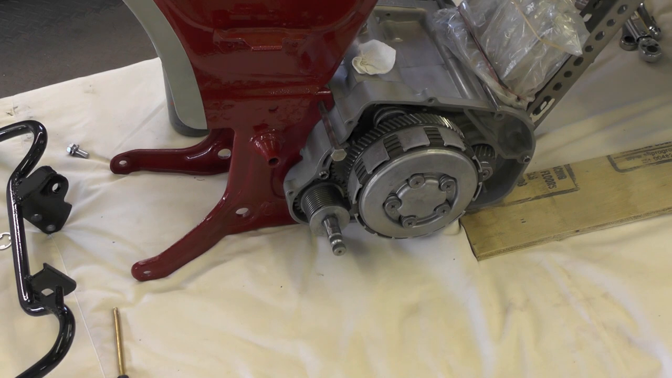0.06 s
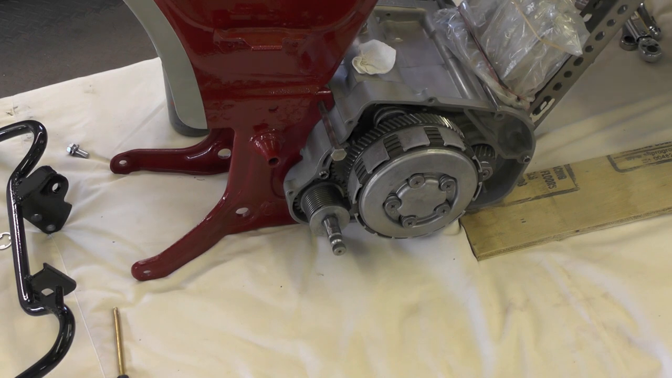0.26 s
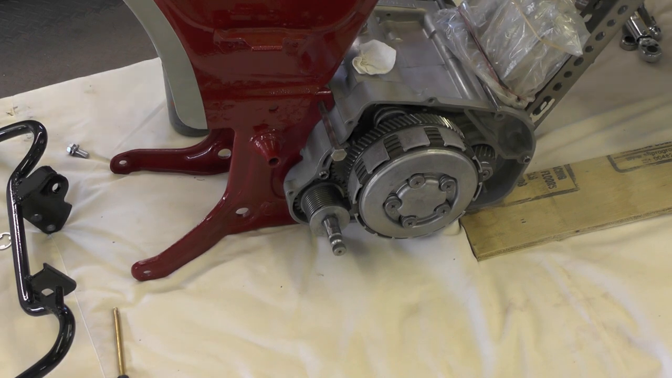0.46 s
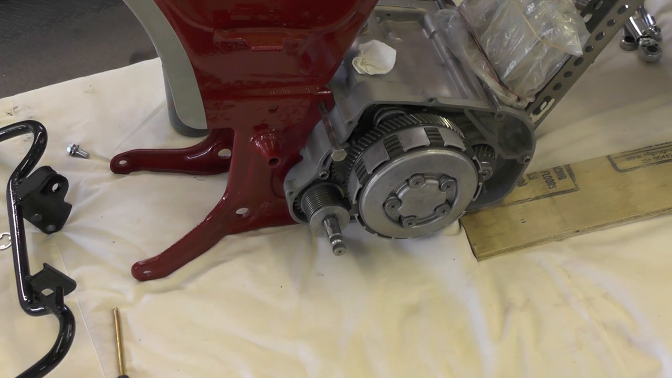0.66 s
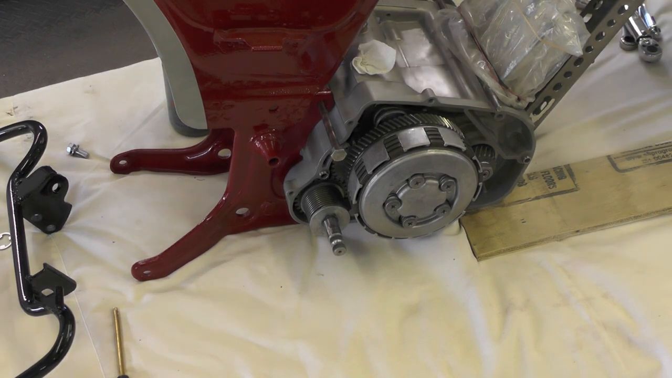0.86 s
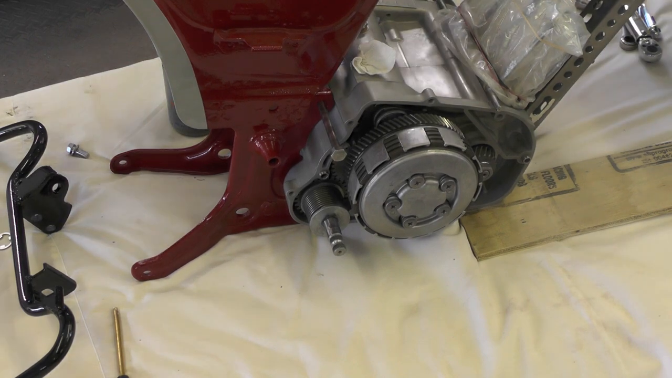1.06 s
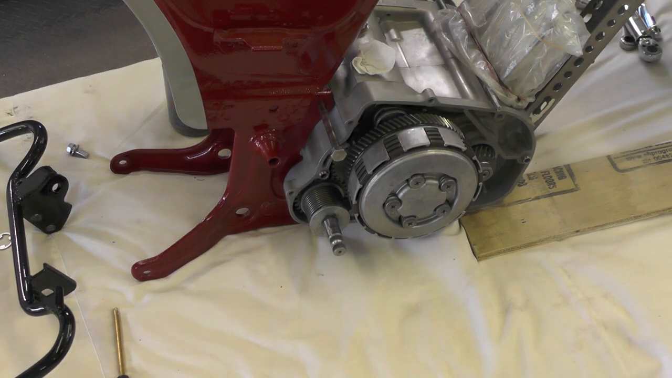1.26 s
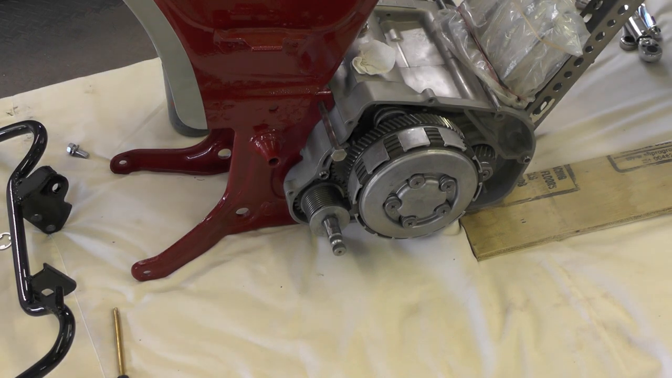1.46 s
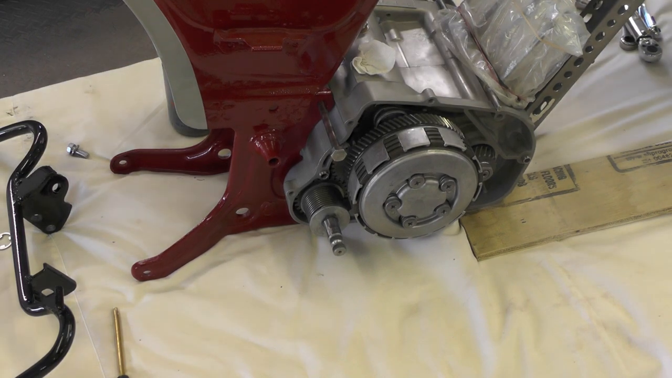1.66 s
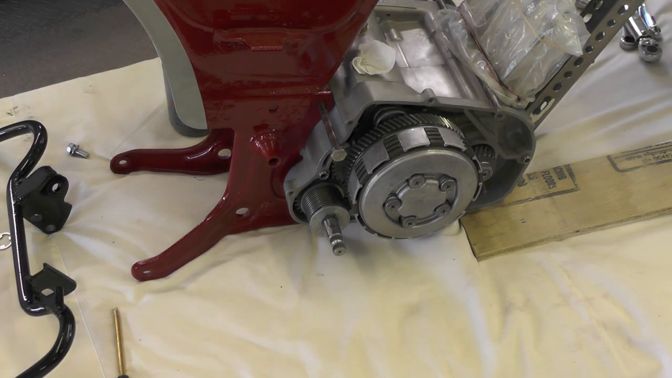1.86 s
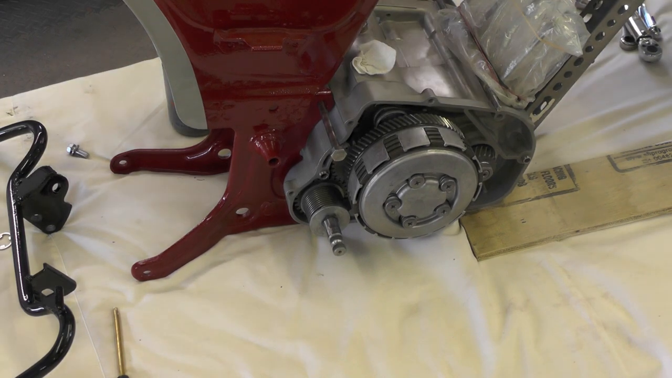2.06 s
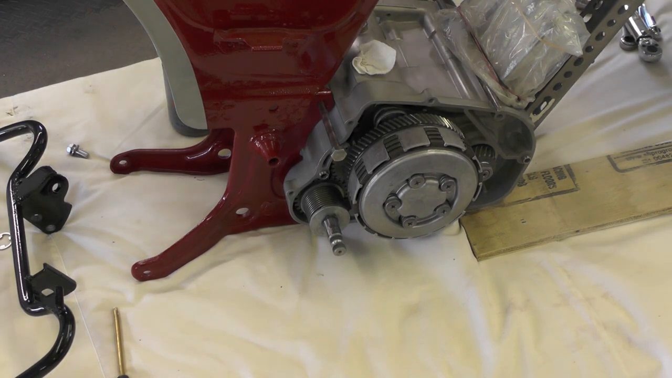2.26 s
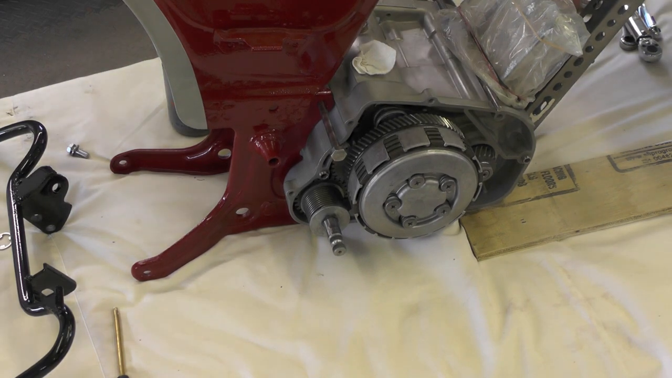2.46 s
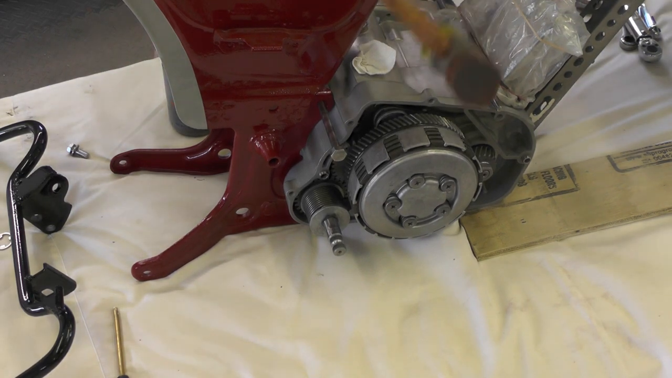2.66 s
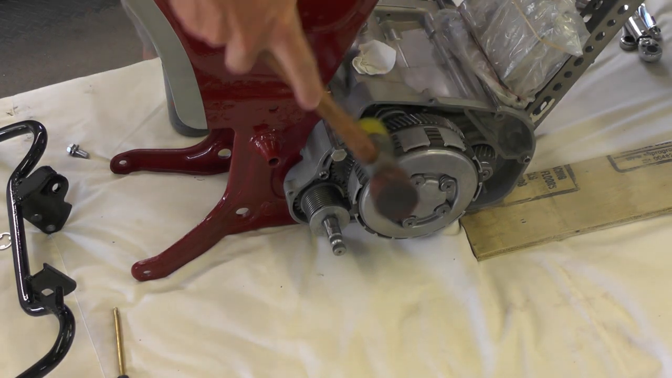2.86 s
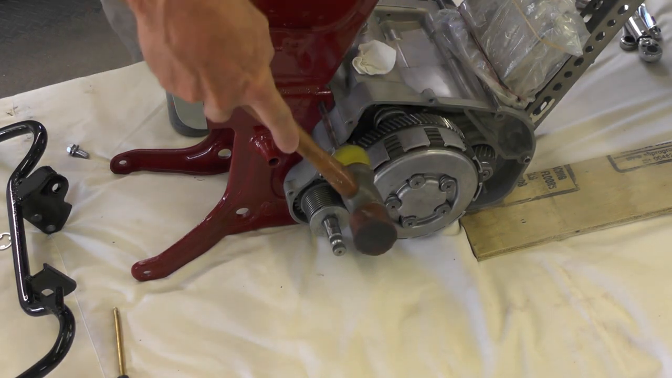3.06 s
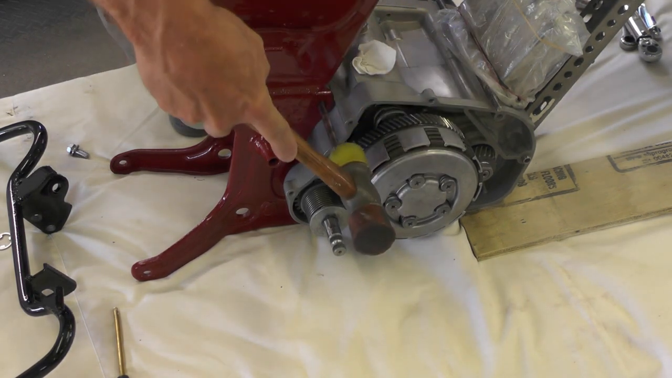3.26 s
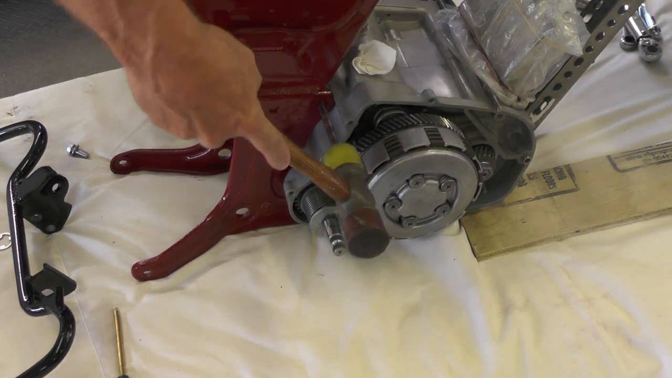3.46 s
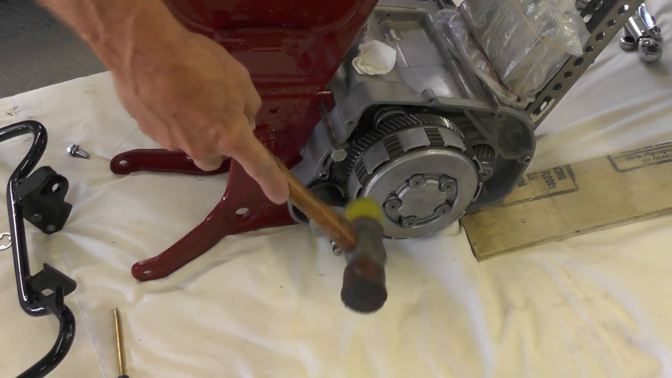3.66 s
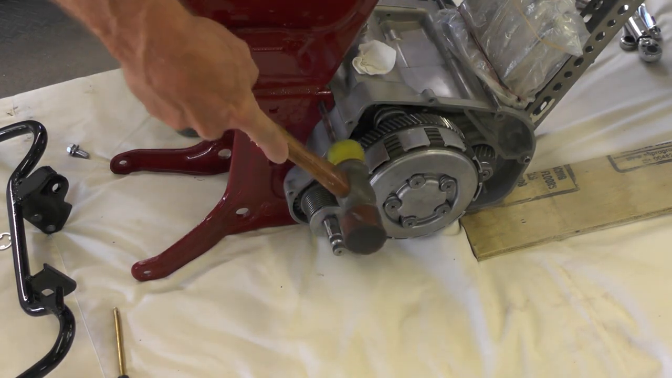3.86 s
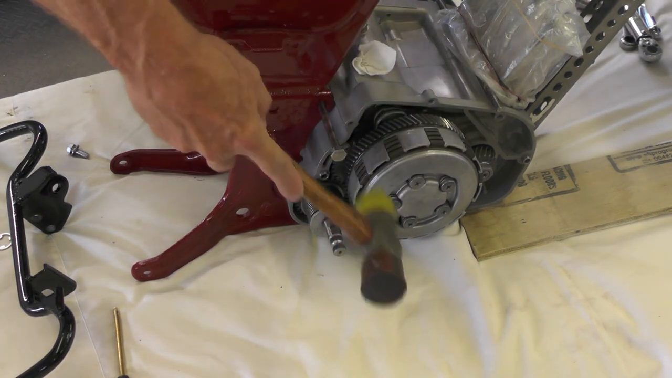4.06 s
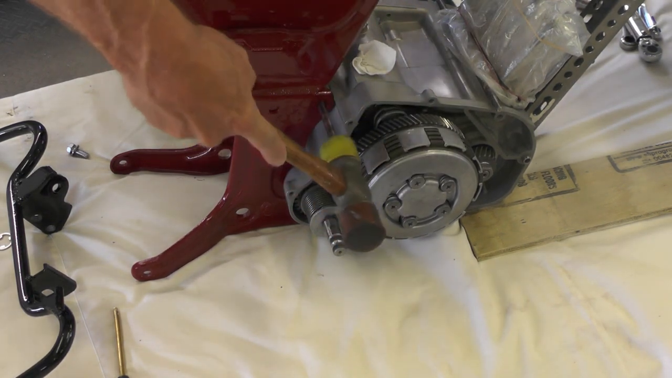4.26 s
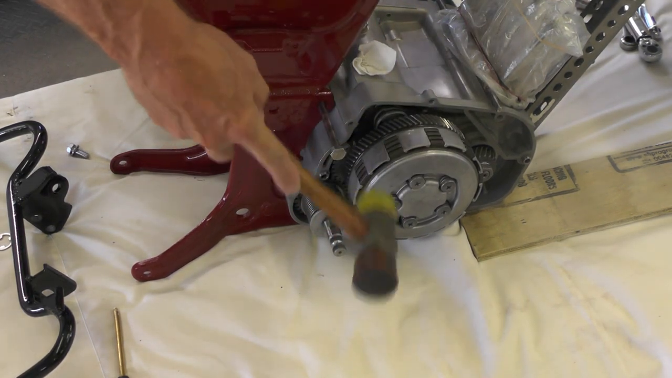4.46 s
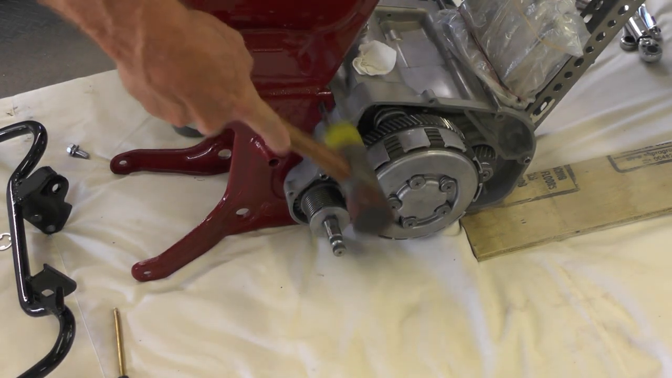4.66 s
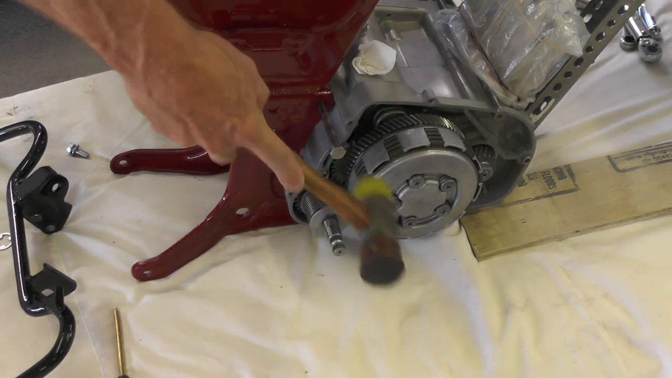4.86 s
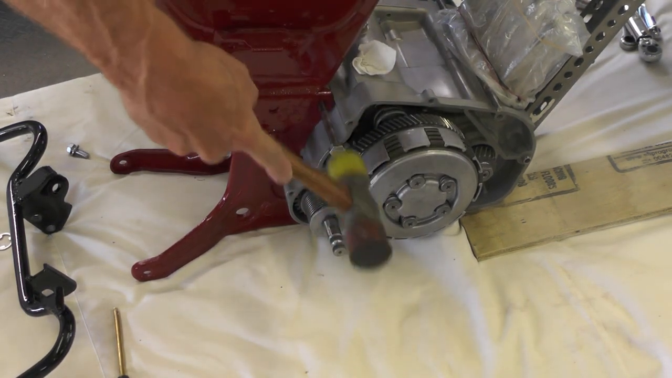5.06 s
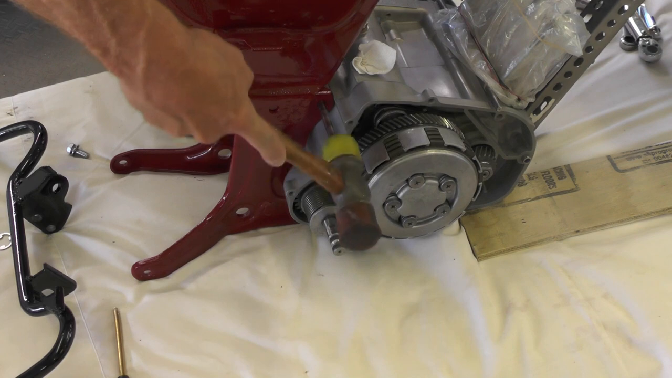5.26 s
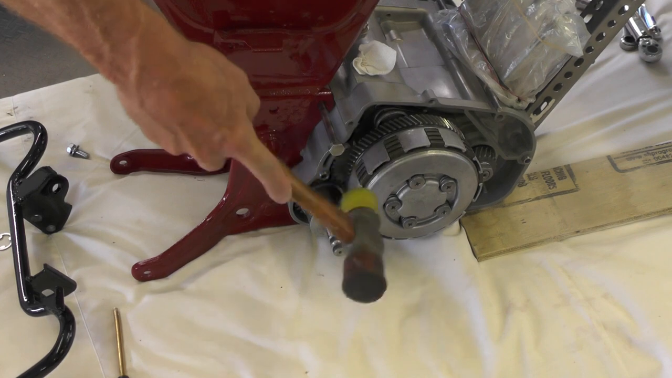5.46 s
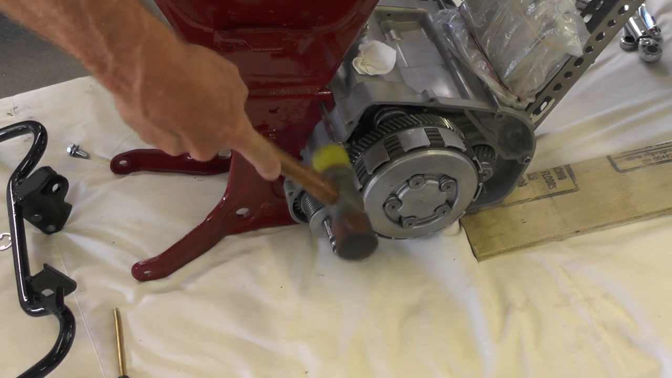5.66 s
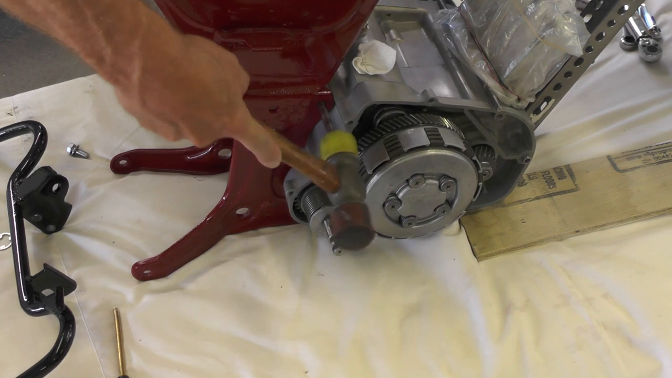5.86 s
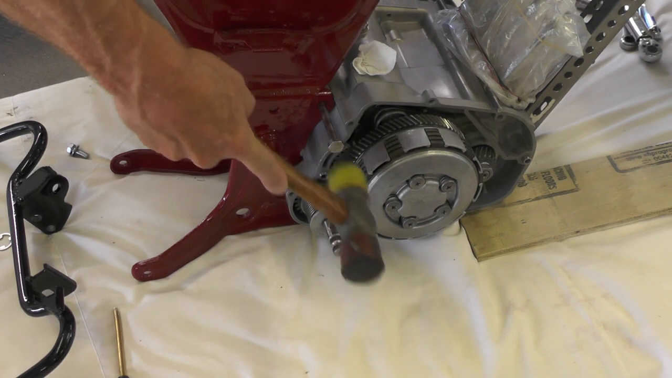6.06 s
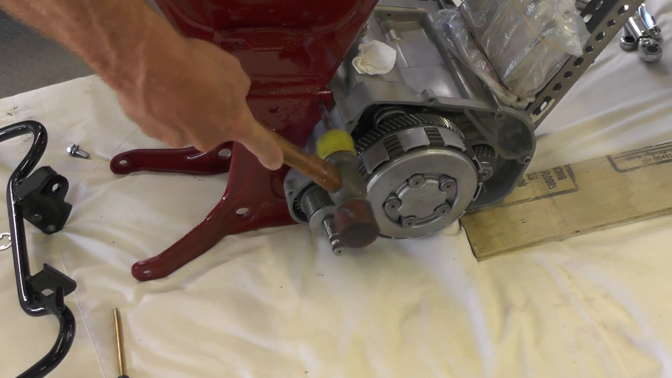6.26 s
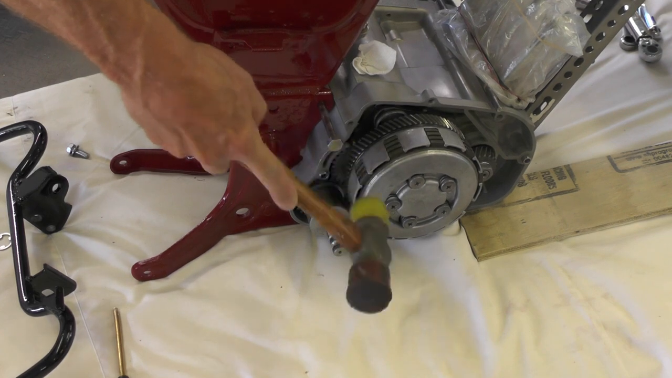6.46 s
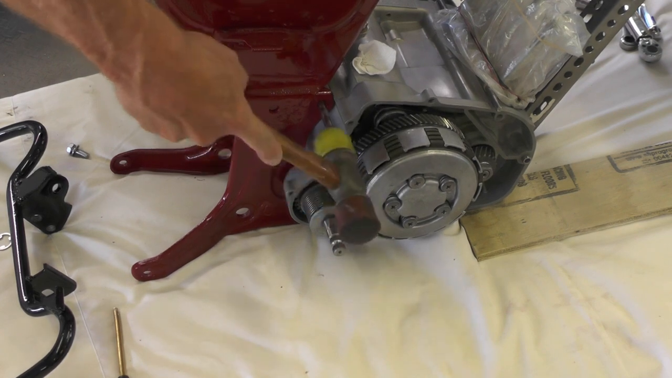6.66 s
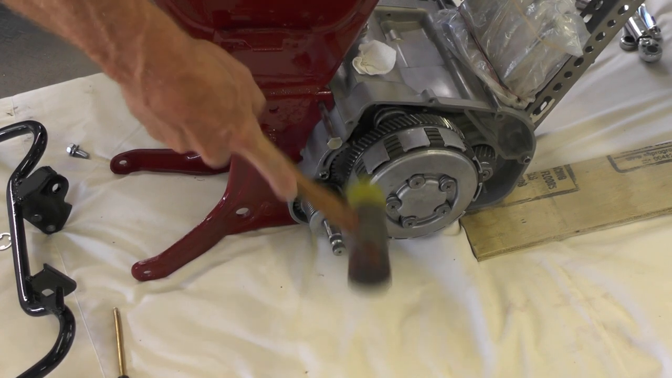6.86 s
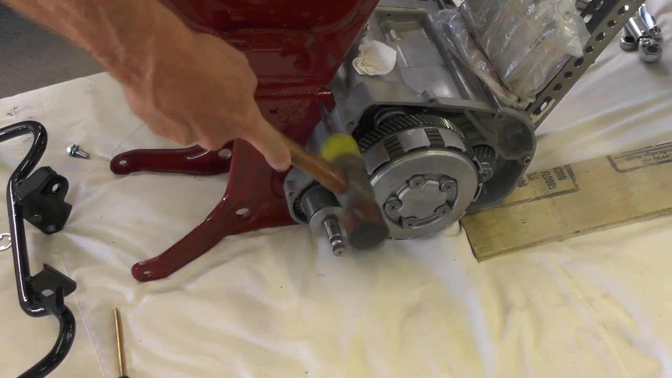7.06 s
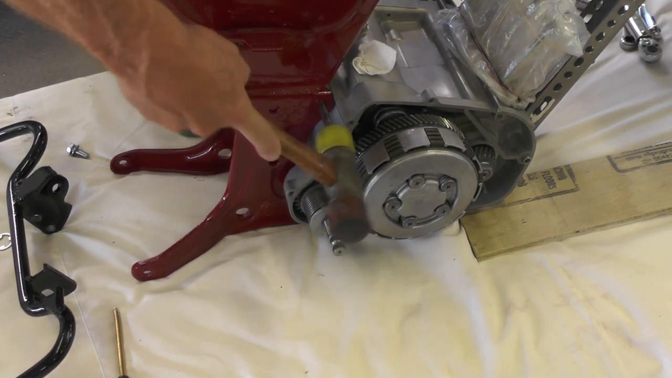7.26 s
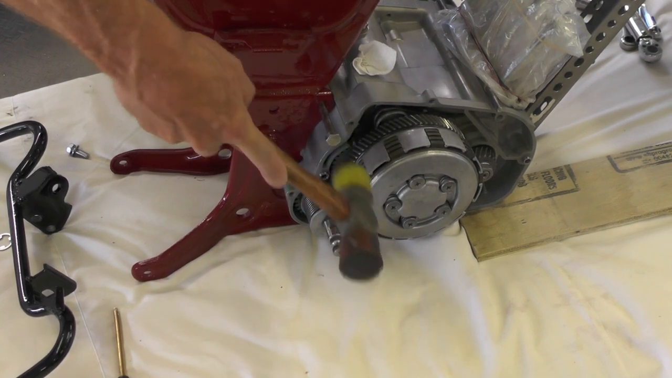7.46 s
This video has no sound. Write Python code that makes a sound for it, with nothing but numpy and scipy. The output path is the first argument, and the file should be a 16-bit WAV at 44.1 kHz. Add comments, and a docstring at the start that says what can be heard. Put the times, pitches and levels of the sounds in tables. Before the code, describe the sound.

Quiet handling ticks and a tool clink lead into a dozen mallet blows on a metal engine casting, growing harder and higher-pitched, echoing in a garage.

```python
"""In a small hard garage a plastic-faced mallet taps, then strikes, an engine mount in a motorcycle frame.
The blows come about three a second. Each is a crack of shaped noise plus damped modes of the casting,
filtered by the spectrum of its force; standing waves and diffuse echoes answer it.
Before the blows a steel tool clinks as a sum of modes, and things are set down with filtered-noise thuds.
A few handling ticks sound too, all over quiet hiss and a faint hum."""
import sys
import numpy as np
from scipy import signal
from scipy.fft import rfft, irfft, next_fast_len
from scipy.io import wavfile

SR = 44100
rng = np.random.default_rng(int(sys.argv[2]) if len(sys.argv) > 2 else 0)


def generate_wav(sig):
    """Save sig (samples, or channels by samples) to the path in sys.argv[1] as 16-bit PCM at SR."""
    pcm = np.round(np.clip(np.atleast_2d(sig).T, -1, 1) * 32767).astype(np.int16)
    wavfile.write(sys.argv[1], SR, pcm)


N = 331632  # length in samples
TOP_HZ = 15900  # upper limit of the sound
T = np.arange(2 ** 15) / SR  # age of a ring in seconds, long enough for any to die away
SIDES = np.array([[1], [-1]])  # opposite signs of a difference signal in left and right

# Left-right difference of the echoes against pitch. Each row: frequency in Hz, relative gain in dB.
ECHO_WIDTH = [(40, 14), (120, -9), (350, -5.5), (900, -3), (4000, -4), (8000, -5.5), (13000, 9)]


def undb(db):
    """A level in decibels is twenty times the logarithm of an amplitude ratio; return that ratio."""
    return 10 ** (np.asarray(db) / 20)


def unit(x):
    """Energy is the sum of squared samples; scale it to one."""
    return x / np.sqrt(np.sum(x ** 2))


def fade(t60):
    """Linear damping gives an exponential decay, here losing 60 dB in t60 seconds."""
    return np.exp(-np.log(1000) * T / t60)


def lookup(points, hz):
    """Pitch is logarithmic in frequency, so (Hz, value) points are interpolated on a log axis."""
    at, value = np.transpose(points)
    return np.interp(np.log(np.maximum(hz, 1)), np.log(at), value)


def colour(x, points):
    """Minimum phase: folding the cepstrum gives a causal filter through (Hz, dB) points."""
    half = next_fast_len(len(x) // 2 + 1024)
    gain = undb(lookup(points, np.linspace(0, SR / 2, half + 1)))
    cepstrum = irfft(np.log(gain))
    cepstrum[1:half] *= 2
    cepstrum[half + 1:] = 0
    response = np.exp(rfft(cepstrum))
    return irfft(rfft(x, 2 * half) * response)[:len(x)]


def band(x, low_hz, high_hz, order=2):
    """A Butterworth band-pass is maximally flat between its two edges."""
    edges = [low_hz, min(max(high_hz, 1.1 * low_hz), .45 * SR)]
    return signal.sosfilt(signal.butter(order, edges, "band", fs=SR, output="sos"), x)


def noise():
    """White noise has equal power at all frequencies; it lasts as long as the longest ring."""
    return rng.standard_normal(len(T))


def add(track, s, sound):
    """Superposition: sound pressures sum, from s seconds onwards."""
    start = int(s * SR)
    track[..., start:start + sound.shape[-1]] += sound[..., :N - start]


def damped_mode(hz, t60):
    """A struck mode is a sine under an exponential decay."""
    return unit(fade(t60) * np.sin(2 * np.pi * hz * T))


def ring(modes, scatter_db, detune):
    """Modal sum: every contact point weights and detunes the modes a little differently."""
    chance = rng.standard_normal((len(modes), 2))
    total = np.zeros(len(T))
    for k, ((hz, db, t60), (a, b)) in enumerate(zip(modes, chance)):
        gain = (-1) ** k * undb(db + scatter_db * a)  # neighbouring modes start in opposite directions
        total += gain * damped_mode(hz * (1 + detune * b), t60)
    return total


def air(level_db=-64.5, hum_hz=113, hum_db=-76, waver_db=1):
    """Stationary noise: rumble and hiss shaped by a spectrum waver slightly in level beside a faint hum."""
    # Still air and microphone hiss. Each row: frequency in Hz, relative spectral level in dB.
    spectrum = [(15, -53), (25, -19), (53, -4.5), (99, -5.5), (175, -1.5), (326, -8.5), (363, -5),
                (405, -9.5), (516, -12), (962, -20.5), (1400, -18), (2550, -22), (3430, -16), (7510, -29.5),
                (16000, -28)]
    # Its stereo width. Each row: frequency in Hz, side minus mid in dB.
    width = [(30, 7), (70, -12.5), (600, -7), (1500, -14.5), (4400, -39), (8000, -5), (15000, -3)]
    t = np.arange(N) / SR
    mid = colour(rng.standard_normal(N), spectrum)
    side = colour(rng.standard_normal(N), spectrum)
    waver = np.interp(t, np.linspace(0, t[-1], 32), rng.standard_normal(32))
    stereo = (mid + SIDES * colour(side, width)) / mid.std()
    hum = undb(hum_db) * np.sqrt(2) * np.sin(2 * np.pi * hum_hz * t)
    return stereo * undb(level_db + waver_db * waver) + hum


def standing_waves():
    """Room modes: waves between the walls resonate at low pitches; return their impulse response."""
    # Resonances of the garage. Each row: frequency in Hz, peak gain in dB, t60 in seconds.
    modes = [(111.8, 1, 0.65), (148, 1, 0.23), (280.7, 11, 0.63), (316, 10, 0.66), (328, 15, 0.6),
             (440.6, 12, 0.48), (477.7, 11.5, 0.57), (527, 14, 0.54), (560, 6, 0.75), (582.5, 11, 0.45),
             (666, 1.5, 0.99), (729, 5, 0.87), (761, 5.5, 0.28), (805, 0.5, 1), (844, 0.5, 0.52),
             (1085, 5, 1), (1080, 3, 0.35), (1145, 7, 1)]
    response = np.zeros(len(T))
    for hz, db, t60 in modes:
        decay = fade(t60)
        response += undb(db) * 2 * decay / decay.sum() * np.sin(2 * np.pi * hz * T)
    return response


def reflections(early_db=-4, early_t60=0.21, gap=0.0032, wall_db=-19, wall_s=0.017, wall_spread=0.013):
    """Diffuse reverberation: an early cluster from floor and frame, a dull wall return, a tail dying by band."""
    # Colour of the early cluster and tail. Each row: frequency in Hz, relative gain in dB.
    tone = [(50, -9), (115, 1.5), (300, -0.5), (550, -2), (900, -4), (1500, -6.5), (3500, -10),
            (8000, -3.5), (15000, -20)]
    # Decay of the tail. Each row: frequency in Hz, t60 in seconds.
    decay = [(100, 0.5), (250, 0.67), (600, 0.71), (1500, 0.76), (4000, 1), (10000, 0.65), (16000, 0.098)]
    spectrum = rfft(noise())
    hz = np.linspace(0, SR / 2, len(spectrum))
    centres, t60s = np.transpose(decay)
    onset = 1 - np.exp(-(T / gap) ** 2)  # gap: seconds before the echoes build up
    tail = np.zeros(len(T))
    for share, t60 in zip(np.eye(len(centres)), t60s):
        # overlapping bands, each centred on one row of the decay table
        part = irfft(spectrum * lookup(list(zip(centres, share)), hz))
        tail += part * unit(onset * fade(t60))
    # the lows come back late, so each knock seems to fall in pitch
    late = np.exp(-((T - wall_s) / wall_spread) ** 2)
    wall = unit(band(noise() * late, 348, 580))
    early = unit(noise() * onset * fade(early_t60))
    return colour(tail + undb(early_db) * early, tone) + undb(wall_db) * wall


def garage(x, waves, side_db=-9):
    """Convolution: direct sound plus room response at two close microphones, with new echoes at every call."""
    mid = signal.fftconvolve(x, waves + reflections())[:len(x)]
    side = signal.fftconvolve(x, colour(reflections(), ECHO_WIDTH))[:len(x)]
    return x + mid + SIDES * undb(side_db) * side


def handling(thud_t60=0.093, tick_octaves=1.7):
    """Damped impacts: padding leaves dull low noise, and small dry contacts leave brief band-limited ticks."""
    # Things set down on the padded floor. Each row: start in seconds, energy in dB, upper band edge in Hz.
    thuds = [(0.25, -32.5, 895), (1.737, -21, 1230), (1.765, -20, 160), (1.85, -28, 750), (2.70, -30, 215)]
    # Handling ticks. Each row: start in seconds, energy in dB, centre in Hz, decay to 1/e in seconds.
    ticks = [(.228, -30.5, 1510, .037), (.451, -34, 8500, 0.002), (.658, -39.5, 3000, .004),
             (.924, -37, 2960, .003), (2.121, -36.5, 2190, 0.0015), (2.155, -38, 5500, 0.00063),
             (2.375, -29.5, 2500, 0.0019), (3.196, -26.5, 5440, 0.0071), (3.659, -37, 2960, 0.015)]
    track = np.zeros(N)
    for s, db, top_hz in thuds:
        thud = band(noise() * fade(thud_t60), 79, top_hz, order=3)
        add(track, s, undb(db) * unit(band(thud, 52, 520, order=1)))
    spread = 2 ** (tick_octaves / 2)
    for s, db, hz, decay in ticks:
        tick = band(noise() * np.exp(-T / decay), hz / spread, hz * spread)
        add(track, s, undb(db) * unit(tick))
    return track


def tool(scrape_db=-3, scrape_t60=0.4, click_db=-10, click_t60=0.038):
    """Modal excitation: a steel tool knocks and rebounds, and harder contacts reach its higher modes."""
    # Modes of the tool. Each row: frequency in Hz, relative energy in dB, t60 in seconds.
    modes = [(308, 1.5, 0.09), (375, -6.5, 0.19), (547, -14, 0.23), (610, 3, 0.13), (885, 2, 0.079),
             (1227, -5, 0.24), (2120, 1, 0.58), (2155, -2, 0.54), (2700, -4, 0.065), (4335, -8, 0.36),
             (6840, -24, .25), (8140, -4.5, 0.2), (8330, -14, 0.15)]
    # Its clinks. Each row: start in seconds, energy in dB, hardness as the upper band edge in Hz.
    clinks = [(1.243, -17, 2300), (1.2696, -9.5, 11200), (1.294, -19.5, 12000), (1.305, -12, 5000)]
    track = np.zeros(N)
    for s, db, hard_hz in clinks:
        scrape = unit(band(noise() * fade(scrape_t60), 230, 1300, order=1))
        click = unit(band(noise() * fade(click_t60), 920, 2600, order=1))
        steel = unit(ring(modes, scatter_db=2, detune=.002))
        clink = steel + undb(scrape_db) * scrape + undb(click_db) * click
        add(track, s, undb(db) * unit(band(clink, 89, hard_hz)))
    return track


def thump():
    """Opposite polarity: one hard blow jolts the two microphones in opposite directions."""
    # The deep thump: start in seconds, energy in dB, decay to 1/e in seconds before filtering.
    s, db, decay = (6.986, -2, 0.0099)
    track = np.zeros((2, N))
    jolt = unit(band(np.exp(-T / decay), 6.4, 90, order=1))
    add(track, s, SIDES * undb(db) * jolt)
    return track


def blow_force(knock_hz, strength_db, hardness_db, tilt_db):
    """Contact stiffness shapes the force, as (Hz, dB): bass level, peak near the knock, then a treble step."""
    push_db, push_octaves = 3.5, 0.34  # height and width of the peak
    step_octaves, step_softness = 0.63, 0.59  # centre of the step above the knock and its gradualness, octaves
    tilt_hz = 765  # the angle of the face tilts the spectrum above this pitch
    hz = np.geomspace(100, 14000, 44)
    above = np.log2(hz / knock_hz)
    push = push_db * np.exp(-(above / push_octaves) ** 2)
    step = hardness_db / (1 + np.exp((step_octaves - above) / step_softness))
    tilt = tilt_db * np.maximum(np.log2(hz / tilt_hz), 0)
    return list(zip(hz, strength_db + push + step + tilt))


def face_contact(age, crack_db=5.5, buzz_db=0, buzz_t60=0.15):
    """Contact noise: the plastic face chatters on metal in a short crack, with a longer buzz behind it."""
    # Colour of the crack and buzz. Each row: frequency in Hz, relative level in dB.
    tone = [(60, -10), (300, 2.5), (900, 12.5), (1700, 6), (2150, -3), (3300, 1), (4000, 0.5), (5500, -1.5),
            (7000, -8.5), (9500, -6.5), (10800, -8.5), (12800, -11), (14500, -13), (16000, -21)]
    crack = unit(colour(noise() * age ** 1.02 * np.exp(-1.4 * age), tone))
    buzz = unit(colour(noise() * fade(buzz_t60) * (1 - np.exp(-age)), tone))
    return undb(crack_db) * crack + undb(buzz_db) * buzz


def casting(age, knock_hz, clank_hz, ring_db=-1.0, knock_db=3, knock_t60=0.047, clank_db=0, clank_t60=0.018):
    """Inertia delays the modes: the mount's quickly damped knock and clank, and the ring of the engine."""
    # Engine and frame: bolts damp the heavy parts, the clutch steel rings on.
    # Each row: frequency in Hz, relative energy in dB, t60 in seconds.
    engine = [(116.7, -12, 0.12), (152, -11, 0.11), (225.6, -15.5, 0.083), (289, -5, 0.059),
              (344.7, -2.5, 0.19), (462, -3, 0.043), (493, -2, 0.11), (604, -0.5, 0.065),
              (717.4, -0.5, 0.04), (789, 4.5, 0.028), (872, -1.5, 0.031), (952, 1, 0.024),
              (1094, -10, 0.038), (1117, -13, 0.019), (1440, -10, 0.011), (1458, -5, 0.057),
              (1581, -5.5, 0.023), (1750, -18, 0.11), (1857, -13.5, 0.1), (2870, -8, 0.024),
              (3440, -11, 0.014), (4300, -27, 0.19), (4830, -15, 0.11), (5190, -21, 0.22),
              (5400, -27, 0.19), (6290, -43, 0.12), (8600, -32, 0.1), (10300, -23, 0.079)]
    knock = undb(knock_db) * damped_mode(knock_hz, knock_t60)
    clank = undb(clank_db) * damped_mode(clank_hz, clank_t60)
    body = knock + clank + undb(ring_db) * ring(engine, scatter_db=1.5, detune=0.0062)
    # the heavy parts take about the length of the contact to get moving
    return body * (1 - np.exp(-1.5 * age))


def echo_wash(age, force, wash_db=-2, wash_t60=.49, wash_side_db=-10):
    """Dense echoes behave as decaying noise: the late echoes of the crack merge into a smooth wash."""
    # Colour of the wash. Each row: frequency in Hz, relative level in dB.
    tone = [(40, -44), (120, -5), (600, 1), (1100, 3), (1500, -12), (2150, -1.5), (2700, 5), (3300, 4.5),
            (4000, 2.5), (5500, 1), (8000, -5), (10800, -17), (12800, -8), (14500, -32), (16000, -31)]
    envelope = fade(wash_t60) * (1 - np.exp(-age))
    mid = colour(unit(colour(noise() * envelope, tone)), force)
    side = colour(unit(colour(noise() * envelope, tone)), force)
    return undb(wash_db) * (mid + SIDES * undb(wash_side_db) * colour(side, ECHO_WIDTH))


def mallet(room, ping_hz=3350, ping_t60=0.0059):
    """Source-filter principle: crack, ping and casting are filtered by the blow's force, then by the room."""
    # Blows; the knock tends to rise as the mount is driven home and stiffens.
    # Each row: start in seconds, time scale of the contact chatter in seconds, knock in Hz, clank in Hz,
    # strength in dB, hardness of the contact in dB, treble tilt in dB per octave,
    # ping of the face in dB before the force filter.
    blows = [(3.3992, 0.0032, 468, 1410, -8.5, -30.5, -1.1, -9),
             (3.8914, 0.0017, 467, 1365, -3, -10, 2, 0.5),
             (4.2812, 0.00084, 463, 1757, -1.3, -10.5, 4, 1.5),
             (4.5985, 0.00094, 503, 1430, -0.2, -3.5, -0.8, 2.5),
             (4.9908, 0.003, 652, 1430, -1.95, -11, 2.5, -2.5),
             (5.3104, 0.002, 707, 1400, -0.84, -3, 2, -7),
             (5.6171, 0.0012, 745, 1430, -0.1, -2.1, 1.45, -9),
             (5.9315, 0.0023, 809, 1830, -0.7, 0.5, 0.94, -1.5),
             (6.2687, 0.0022, 915, 1453, -0.9, 4.5, -0.96, -1.5),
             (6.6274, 0.00089, 1045, 1890, -2.5, 7.5, -0.94, -2),
             (6.9844, 0.0022, 832, 1580, 0.6, 3.5, -0.54, -3),
             (7.333, 0.001, 929, 1490, -1.5, 5, -0.73, -1.5)]
    track = np.zeros((2, N))
    for s, chatter, knock_hz, clank_hz, strength_db, hardness_db, tilt_db, ping_db in blows:
        age = T / max(chatter, 1 / SR)  # time in units of the chatter
        force = blow_force(knock_hz, strength_db, hardness_db, tilt_db)
        ping = undb(ping_db) * damped_mode(ping_hz, ping_t60)
        blow = face_contact(age) + ping + casting(age, knock_hz, clank_hz)
        # the blows carry no deep bass
        direct = band(colour(blow, force), 89, TOP_HZ)
        add(track, s, garage(direct, room))
        add(track, s, echo_wash(age, force))
    return track


def scene():
    """Superposition: blows, tool and handling excite the same standing waves, above the air and the thump."""
    room = standing_waves()
    return air() + garage(handling() + tool(), room) + thump() + mallet(room)


def record(dry):
    """An elliptic low-pass trades slight ripple for a steep cut of the top."""
    return signal.sosfilt(signal.ellip(8, .2, 70, TOP_HZ, fs=SR, output="sos"), dry)


dry = scene()
out = record(dry)
generate_wav(out)
```